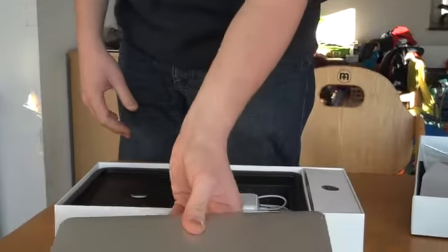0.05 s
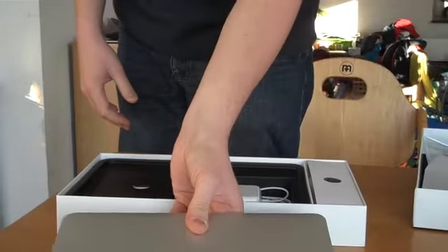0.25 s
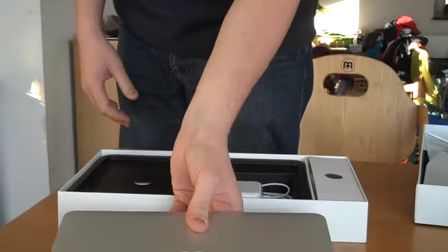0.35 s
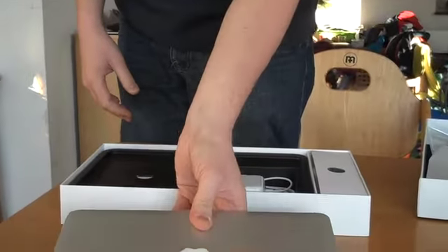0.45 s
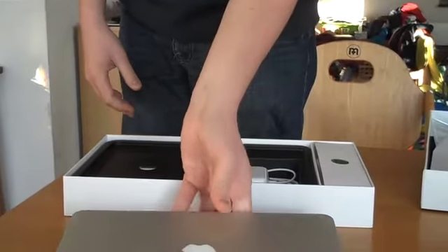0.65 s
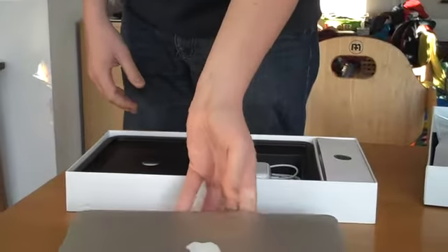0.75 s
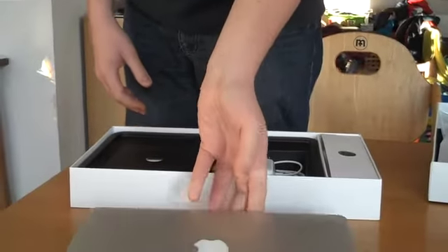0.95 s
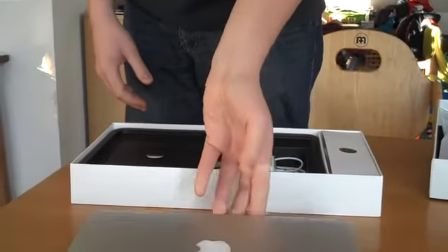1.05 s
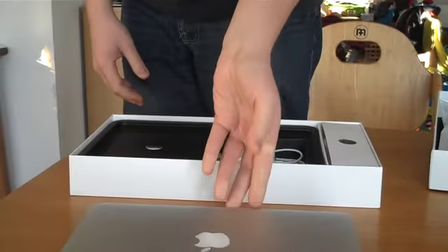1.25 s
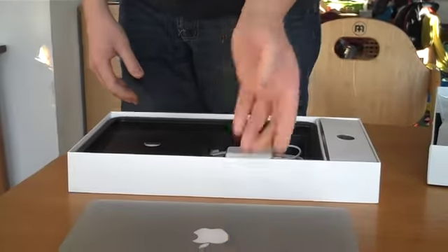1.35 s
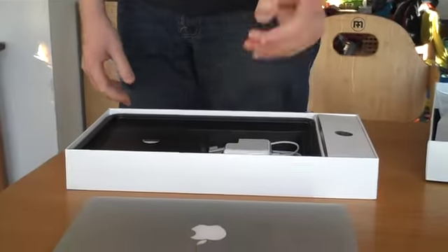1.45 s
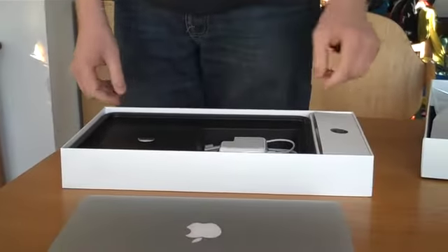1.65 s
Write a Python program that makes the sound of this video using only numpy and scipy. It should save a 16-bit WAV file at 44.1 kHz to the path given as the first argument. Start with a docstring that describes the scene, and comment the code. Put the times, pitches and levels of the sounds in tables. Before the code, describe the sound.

Thin metal laptop knocks onto a wooden tabletop, slides briefly, then its other edge drops with a clack

```python
"""Laptop set down on a table

A metal laptop is lowered onto a wooden table in a small live room: one edge touches and knocks down,
the case slides a little, then the fingers slip out and the other edge drops with a thud.
Knocks are decaying noise with damped wood modes; after both hard knocks, random contacts excite metal modes.
Sliding is filtered friction grains, the slipping fingers are modulated narrow-band noise."""
import sys
import numpy as np
from scipy import signal
from scipy.fft import rfft, irfft, next_fast_len
from scipy.io import wavfile
from scipy.ndimage import map_coordinates

SR = 44100
rng = np.random.default_rng(int(sys.argv[2]) if len(sys.argv) > 2 else 0)


def to_wav(sig):
    """Store sig (one row per channel, or 1-D mono) as 16-bit WAV at the path in sys.argv[1].

    Samples outside -1..1 are clipped; the rate is SR.
    """
    pcm = np.clip(np.atleast_2d(sig), -1, 1) * 32767
    pcm = np.round(pcm).astype(np.int16)
    wavfile.write(sys.argv[1], SR, pcm.T)  # frames by channels


N = 74970  # length [samples]


def amp(db):
    """Level to amplitude ratio: 20 dB per factor of ten."""
    return 10 ** (np.asarray(db) / 20)


def unit(x):
    """Normalisation to unit mean power (rms 1)."""
    return x / np.sqrt(np.mean(x ** 2) + 1e-20)


def norm(x):
    """Normalisation to unit energy (sum of squares 1)."""
    return x / np.sqrt(np.sum(x ** 2) + 1e-20)


def along(points, hz):
    """Interpolation of (frequency [Hz], value) points on a logarithmic frequency axis."""
    f, value = np.transpose(points)
    return np.interp(np.log(hz + 1), np.log(f + 1), value)


def times():
    """Sampled time axis [s]."""
    return np.arange(N) / SR


def coloured(x, gain_db):
    """Minimum-phase filtering: a causal response follows from the log magnitude by way of the cepstrum."""
    m = 2 * next_fast_len(N)
    log_gain = np.log(amp(gain_db(np.fft.rfftfreq(m, 1 / SR))))
    cepstrum = irfft(log_gain, m)
    # fold the negative times onto the positive ones
    cepstrum[1:m // 2] *= 2
    cepstrum[m // 2 + 1:] = 0
    response = np.exp(rfft(cepstrum))
    return irfft(rfft(x, m) * response, m)[:N]


def above(hz, corner_hz):
    """Smooth spectral step: 0 well below the corner, one half at it, 1 well above."""
    return hz ** 3 / (hz ** 3 + corner_hz ** 3)


def dying(t60, size):
    """Frequency-dependent decay: each band of the noise falls 60 dB in its own t60(hz)."""
    hz, t, bands = signal.stft(rng.standard_normal(N), SR, nperseg=size)
    decay = amp(-60 * t / t60(hz)[:, None])
    return signal.istft(bands * decay, SR, nperseg=size)[1][:N]


def fade(t, t60):
    """Exponential decay, 60 dB in t60, held at 1 before t = 0."""
    return np.exp(-np.log(1000) * np.maximum(t, 0) / t60)


def ring(modes, scatter_db):
    """Modal superposition: damped sines of alternating sign, with levels scattered anew at every call."""
    t = times()
    out = np.zeros(N)
    for k, (hz, db, t60) in enumerate(modes):
        strength = amp(db + scatter_db * rng.normal()) * (-1) ** k
        out += strength * np.sin(2 * np.pi * hz * t) * fade(t, t60)
    return out


def grains(per_s):
    """Shot noise: tiny contacts of random strength at random moments, per_s on average, rms 1."""
    struck = rng.random(N) < per_s / SR
    return unit(struck * rng.standard_normal(N))


def wobble(per_s):
    """Slow random modulation: a smooth curve through per_s random knots a second."""
    return map_coordinates(rng.standard_normal(N // 100), [times() * per_s], mode="mirror")


# reverberation of the small room: (frequency [Hz], decay time t60 [s])
ROOM_DECAY = [(100, 0.9), (350, 0.67), (900, 0.56), (2500, 0.55), (5000, 0.43), (9000, 0.55)]
ROOM_DELAY_S, ROOM_BUILD_S = 0.0025, 0.01


def in_room(x, wet_db):
    """Diffuse reverberation: the direct sound plus its convolution with decaying noise."""
    build_up = np.clip((times() - ROOM_DELAY_S) / ROOM_BUILD_S, 0, 1)
    tail = dying(lambda hz: along(ROOM_DECAY, hz), size=256) * build_up
    power = np.abs(rfft(tail))[:N // 8] ** 2  # the tail has unit mean power gain below about 5.5 kHz
    tail = tail / np.sqrt(power.mean())
    return x + amp(wet_db) * signal.fftconvolve(x, tail)[:N]


# spectrum of the background noise: (frequency [Hz], relative level [dB])
BACKGROUND_COLOUR = [(12, -10), (20, -6.5), (32, -20), (188, -24), (242, -23.5), (337, -23.5), (621, -30.5),
                     (762, -23.5), (910, -31), (1090, -26.5), (2280, -28.5), (5550, -34.5), (8770, -52),
                     (11400, -101), (19300, -120)]
BACKGROUND_DB = -69.5  # rms, before the band limit


def background():
    """Stationary coloured noise: the quiet hiss of the room, with its strongest part near 20 Hz."""
    noise = rng.standard_normal(N)
    return amp(BACKGROUND_DB) * unit(coloured(noise, lambda hz: along(BACKGROUND_COLOUR, hz)))


# fingers slipping out: (time [s], centre pitch [Hz], level [dB])
FINGER_SLIP = [(.87, 3230, -105.5), (.91, 3210, -67.5), (1.0, 3293, -69.5), (1.055, 3435, -62),
               (1.078, 3660, -88), (1.12, 3600, -110)]
WHISPER_WIDTH_HZ = 420  # full width of the band


def fingers():
    """Amplitude modulation shifts narrow-band noise to a mostly rising pitch: skin slips along the metal edge."""
    s, pitch, level = np.transpose(FINGER_SLIP)
    t = times()
    band = coloured(rng.standard_normal(N), lambda hz: -10 * np.log10(1 + (2 * hz / WHISPER_WIDTH_HZ) ** 4))
    phase = 2 * np.pi * np.cumsum(np.interp(t, s, pitch)) / SR
    strength = np.interp(t, s, amp(level), left=0, right=0)
    return in_room(unit(band * np.sin(phase)) * strength, wet_db=-23.5)


# a fingertip snaps off the edge just before the drop: (time [s], direct level over 10 ms [dB])
FINGERTIP_SNAP = (1.1473, -52.5)
# modes of that snap: (frequency [Hz], mean level [dB], decay time t60 [s])
SNAP_MODES = [(676, -6.5, 0.054), (1100, -1, 0.022), (1420, -1, 0.013), (3330, -1, 0.011), (3840, -5, .012),
              (5320, -10, 0.0053)]


def tick():
    """Impulsive excitation of short damped modes: a small snap of the fingertip."""
    s, db = FINGERTIP_SNAP
    snap = in_room(norm(ring(SNAP_MODES, scatter_db=2.5)), wet_db=-0.5)
    delayed = np.pad(snap, (round(s * SR), 0))[:N]
    return amp(db) * np.sqrt(SR / 100) * delayed  # unit energy to rms 1 over 10 ms


# rubbing of the sliding case: (time [s], level [dB])
RUB_LEVEL = [(.42, -86), (.5, -63), (.58, -61), (.66, -58), (.73, -59.5), (.8, -57), (.84, -68),
             (.89, -65.5), (.95, -60), (1.0, -63), (1.055, -62), (1.08, -74), (1.15, -93), (1.2, -100)]
# spectrum of the rubbing: (frequency [Hz], relative level [dB])
RUB_COLOUR = [(60, -28.5), (200, -17.5), (380, -6.5), (540, -6.5), (760, 4), (950, -1.5), (1100, 4.5),
              (1350, -7), (1650, 6), (1950, -3.5), (2350, -1), (3200, -7), (4200, -11.5), (6000, -16),
              (7500, -19.5), (9000, -52)]
# spectrum of the added hiss: (frequency [Hz], relative level [dB])
RUB_HISS_COLOUR = [(2000, -34.5), (5000, 12.5), (7000, 8), (9000, -18)]
GRAINS_PER_S, SLIDE_ROOM_DB = 4700, -9
SLIDE_UNEVEN_DB, SLIDE_UNEVEN_PER_S = 0.5, 70
HISS_S, HISS_WIDTH_S, HISS_DB = 0.66, 0.08, -67.5  # centre, Gaussian spread, level at the centre


def slide():
    """Friction noise: fine, uneven contact grains sound through the board, and a swell of hiss brightens them."""
    t = times()
    rub = unit(coloured(grains(GRAINS_PER_S), lambda hz: along(RUB_COLOUR, hz)))
    rub_db = np.interp(t, *np.transpose(RUB_LEVEL)) + SLIDE_UNEVEN_DB * wobble(SLIDE_UNEVEN_PER_S)
    hiss = unit(coloured(grains(GRAINS_PER_S), lambda hz: along(RUB_HISS_COLOUR, hz)))
    swell = np.exp(-0.5 * ((t - HISS_S) / HISS_WIDTH_S) ** 2)
    return in_room(rub * amp(rub_db) + amp(HISS_DB) * hiss * swell, SLIDE_ROOM_DB)


# ringing metal: (frequency [Hz], level before weighting by the root of t60 [dB], decay time t60 [s])
METAL_MODES = [(2367, -4, .42), (2888, -3, .45), (2962, -6, .3), (3025, -2, .22), (3060, 3, .06),
               (3365, -13, .3), (4110, -7, .1), (4215, -7, .15), (4320, -6, .12), (4552, -8, .33),
               (5110, -14, .15), (5330, -12, .12), (5545, -9, .2), (5843, -6, .34), (5890, -11, .3),
               (5925, -10, .3), (6050, -12, .16), (6230, -11, .26), (6400, -11, .22), (7084, -19, .25),
               (7360, -14, .16), (7560, -17, .12)]


def metal_tones(taps):
    """Resonance under random forcing: the taps keep each damped mode of the metal ringing."""
    t = times()
    out = np.zeros(N)
    for hz, level, t60 in METAL_MODES:
        mode = np.sin(2 * np.pi * hz * t) * fade(t, t60)
        out += amp(level) * np.sqrt(t60) * norm(signal.fftconvolve(taps, mode)[:N])
    return norm(out)


# chatter: (start [s], rise [s], hold [s], fall t60 [s], level of the tones before the tilt [dB],
# treble tilt [dB up above 3700 Hz and down below])
CHATTER_BURSTS = [(0.35, 0.015, 0.035, 0.089, -45.5, -1.5), (1.195, 0.015, 0.014, .13, -42, 4)]
# spectrum of the chatter's clicks: (frequency [Hz], relative level [dB])
CHATTER_CLICK_COLOUR = [(100, -27), (500, -3), (1000, 1), (1900, -9), (2400, 4), (2720, -6), (3020, 9),
                        (3250, -15.5), (3750, -9), (4280, 2.5), (4850, -10), (5400, -4.5), (6200, -4),
                        (6750, -24), (7400, -10), (8000, -31), (8600, -36.5), (9000, -23.5)]
CHATTER_PER_S, CHATTER_ROOM_DB = 7500, -4
CLICK_DB = 1.5  # direct clicks relative to the tones
CLUMP_DB, CLUMPS_PER_S = 2, 200  # the strength of the contacts fluctuates


def chatter():
    """Repeated micro-impacts: a swarm of tiny metal contacts swells, clicks and excites the metal's modes."""
    out, t = np.zeros(N), times()
    for s, rise, hold, fall, db, treble_db in CHATTER_BURSTS:
        effort = np.clip((t - s) / rise, 0, 1) * fade(t - s - rise - hold, fall)
        taps = grains(CHATTER_PER_S) * effort * amp(CLUMP_DB * wobble(CLUMPS_PER_S))
        tones = metal_tones(taps)
        clicks = norm(coloured(taps, lambda hz: along(CHATTER_CLICK_COLOUR, hz)))
        both = tones + amp(CLICK_DB) * in_room(clicks, CHATTER_ROOM_DB)
        tilted = coloured(both, lambda hz: treble_db * (2 * above(hz, corner_hz=3700) - 1))
        out += amp(db) * np.linalg.norm(effort) * tilted
    return out


# knocks: (time [s], level of the direct blow over 10 ms [dB], bass [dB], treble [dB], crack [dB],
# clatter t60 at 900 Hz [s], snap over clatter [ratio], wood over contact [dB], boom over blow [dB], room [dB])
KNOCK_BLOWS = [(0.2063, -39.5, -0.5, 0, -1.5, 0.055, 0.41, -6.5, -33, -5),
               (0.239, -48, -1, -9.5, -0.5, 0.053, 0.49, -5.5, -27.5, -2),
               (0.2969, -40, -18, 7, 0, 0.026, 1.04, -18.5, -26.5, 0),
               (0.2977, -23.5, -13.5, -5, 4, 0.025, 2, -2, -34.5, -10),
               (.3223, -42, -22, 7, -4, .015, 0.67, -13, -35, -5.5),
               (.3240, -35, -10, 0.5, 2, 0.044, 0.67, -6.5, -47, -4),
               (.3550, -43.5, 18, -4, -1, 0.15, 1.2, -9, -45, -6),
               (0.6791, -46, -15, -3.5, 1.5, 0.018, 0.64, -5, -34.5, -5.5),
               (0.7116, -50.5, 1.5, 5.5, 1.5, 0.045, 0.78, -15.5, -33.5, -6),
               (1.0264, -59, 0, -25, -5, 0.084, 2.1, -2.5, -10, 0.5),
               (1.173, -40, 20.5, 9, -1.5, 0.015, 1.06, -17, -29, 2.5),
               (1.1744, -33.5, 3, 11, 1.5, 0.021, 0.23, -15.5, -17, -8.5),
               (1.1797, -34.5, 13.5, -11.5, 4, 0.04, 0.069, -17, -13.5, -5.5),
               (1.1940, -36.5, 0.5, 6.5, 4.5, 0.12, 0.29, -9, -49.5, -15)]
# spectrum shared by the knocks: (frequency [Hz], relative level [dB])
CONTACT_COLOUR = [(40, -36), (100, -12), (220, -13.5), (360, -6), (530, -6), (780, 5.5), (1080, -6),
                  (1600, 0), (2100, -4), (2600, -5), (3450, -5.5), (3850, -14.5), (4300, -11),
                  (5300, -14.5), (6100, -25), (7000, -22), (9000, -50)]
# wood under the laptop: (frequency [Hz], mean level before differentiation [dB], decay time t60 [s])
WOOD_MODES = [(315, -10, .17), (386, -6, .15), (690, -11, .04), (748, -5, .05), (810, 0, .06),
              (926, -6, .08), (1200, -12, .08), (1324, -14, .08), (1393, -17, .08), (1548, -17, .05),
              (1626, -20, .08), (1731, -20, .07)]
BASS_HZ, TREBLE_HZ, LOW_CUT_HZ = 431, 2240, 140
BASS_LINGERS = 0.22  # exponent: the clatter dies more slowly in the bass
CRACK_HZ, CRACK_WIDTH_HZ = 3440, 800  # the crack of a hard metal edge
BOOM_HZ, BOOM_T60_S = 135.5, 0.9


def knocks():
    """Impact excitation: each blow is a snap, a short clatter of case and board, wood modes and a table boom."""
    out, t = np.zeros(N), times()
    low_cut = signal.butter(2, LOW_CUT_HZ, "high", fs=SR, output="sos")
    for s, db, bass_db, treble_db, crack_db, t60, snap, ring_db, boom_db, room_db in KNOCK_BLOWS:
        contact = norm(dying(lambda hz: t60 * (1000 / (hz + 100)) ** BASS_LINGERS, size=64))
        contact[0] += snap

        def colour(hz):
            """Spectral shaping: the shared colour with this blow's bass, treble and crack."""
            bass = bass_db * (1 - above(hz, BASS_HZ))
            treble = treble_db * above(hz, TREBLE_HZ)
            crack = crack_db * np.exp(-0.5 * ((hz - CRACK_HZ) / CRACK_WIDTH_HZ) ** 2)
            return along(CONTACT_COLOUR, hz) + bass + treble + crack

        wood = norm(np.gradient(ring(WOOD_MODES, scatter_db=2.0)))  # the slope favours the higher modes
        struck = norm(coloured(contact, colour)) + amp(ring_db) * wood
        blow = norm(signal.sosfilt(low_cut, struck))
        boom = norm(np.sin(2 * np.pi * BOOM_HZ * t) * fade(t, BOOM_T60_S) * (1 - fade(t, 0.017)))
        start = round(s * SR)
        knock = in_room(blow, room_db) + amp(boom_db) * boom
        out[start:] += amp(db) * np.sqrt(SR / 100) * knock[:N - start]  # unit energy to rms 1 over 10 ms
    return out


def scene():
    """Linear superposition of the background and the laptop's contacts, as one channel."""
    return (background() + knocks() + chatter() + slide() + fingers() + tick())[None]


TOP_HZ = 8800  # middle of the band limit's slope


def record(dry):
    """Band limitation: a linear slope 400 Hz wide, with nothing kept above it."""
    m = 2 * next_fast_len(N)
    keep = np.clip((TOP_HZ - np.fft.rfftfreq(m, 1 / SR)) / 400 + 0.5, 0, 1)
    return irfft(rfft(dry, m) * keep, m)[:, :N]


dry = scene()
out = record(dry)
to_wav(out)
```